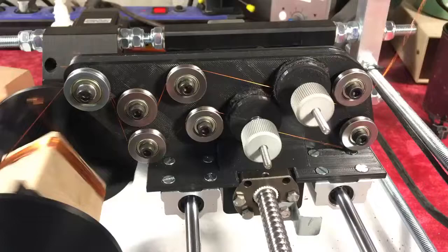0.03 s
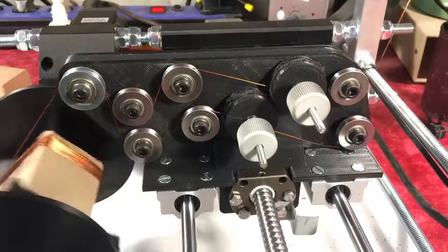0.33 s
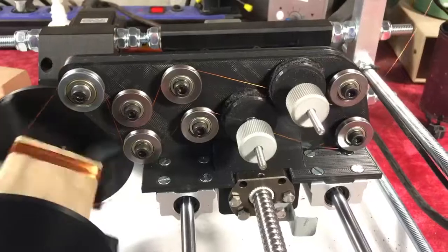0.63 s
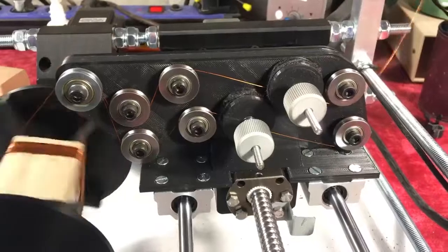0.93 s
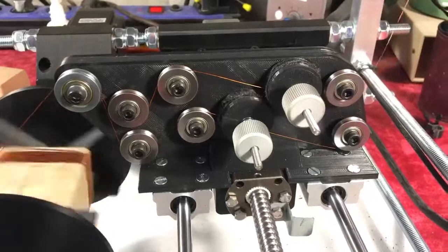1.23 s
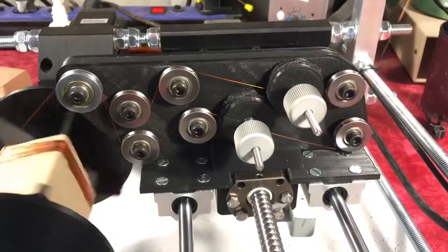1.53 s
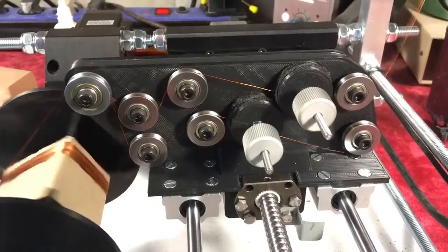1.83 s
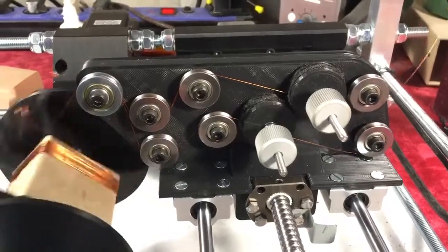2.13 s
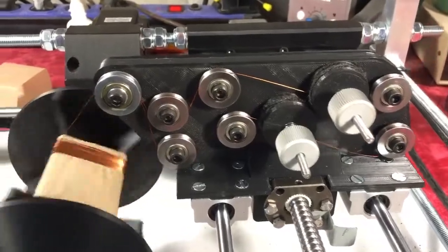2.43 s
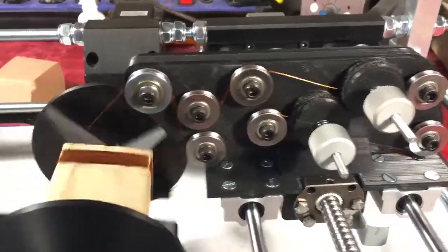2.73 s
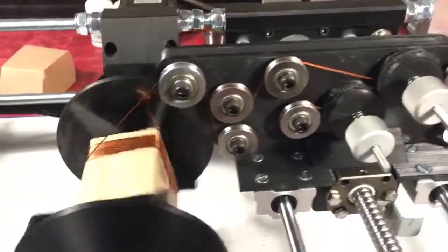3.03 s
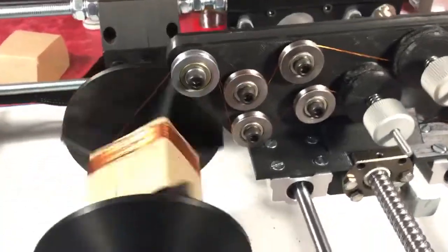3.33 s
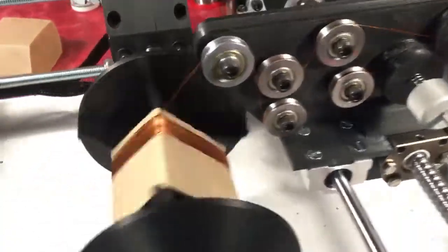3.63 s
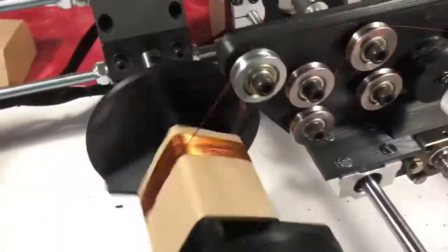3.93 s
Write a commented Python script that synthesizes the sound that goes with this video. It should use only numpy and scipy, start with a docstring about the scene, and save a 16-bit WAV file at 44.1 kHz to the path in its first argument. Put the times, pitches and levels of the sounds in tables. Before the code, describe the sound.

A coil winder's motor hums steadily, close by on a workshop bench, with a held whine and whirring bearings. Wire hisses thinly through its guide, loose pulleys chatter in short bouts, and two brief scrapes pass in the first half.

```python
"""A motor hums close by and shakes its frame: a coil winder running steadily on a workshop bench.
A stepper sings as it feeds the wire guide. Bearings and belt rustle. The shake throws loose pulleys
against their seats, twice a motor turn, in short bouts. Wire hisses through the guide,
with two brief scraping rattles and a few fainter scrapes."""
import sys
import numpy as np
from scipy import signal
from scipy.fft import rfft, irfft, next_fast_len
from scipy.io import wavfile
from scipy.ndimage import map_coordinates

SR = 44100
rng = np.random.default_rng(int(sys.argv[2]) if len(sys.argv) > 2 else 0)


def wrap_up_sound(samples):
    """Save the sound to the file named by the first command line argument, as 16-bit audio."""
    columns = np.atleast_2d(samples).T
    # keep every value between -1 and 1, then stretch to whole-number steps
    tamed = np.clip(columns, -1, 1)
    steps = np.round(tamed * 32767).astype(np.int16)
    wavfile.write(sys.argv[1], SR, steps)


N = 176400

# wire hiss contour: t/s, level/dB before trim
HISS_LEVELS = [(.08, -43.5), (.25, -48.5), (.45, -48.5), (.6, -46.5), (.78, -48), (.95, -49.5), (1.2, -47),
               (1.38, -47.5), (1.55, -47), (2.0, -47), (2.3, -48.5), (2.42, -49), (2.56, -45.5),
               (2.78, -47.5), (3.0, -49), (3.2, -49.5), (3.38, -50), (3.55, -47.5), (3.7, -50.5),
               (4.0, -49)]
# wire hiss spectrum, in front of the guide: f/Hz, relative level/dB
WIRE_FRONT_SPECTRUM = [(3000, -24.5), (5000, -19), (5300, -2), (5900, -7.5), (6400, 5), (6850, 7.5),
                       (7250, 2), (7550, 8), (8200, -6.5), (9000, -5.5), (9400, -24)]
# wire hiss spectrum, beside the guide: f/Hz, relative level/dB
WIRE_SIDE_SPECTRUM = [(3000, -17), (5000, -18), (5500, 0), (6300, 1), (7100, 1), (7700, -0.5), (8500, 3.5),
                      (9000, -0.5), (9400, -24)]
# bearing and belt spectrum: f/Hz, relative level/dB
WHIR_SPECTRUM = [(300, -5), (560, 0), (660, -5), (760, 0.5), (920, 8.5), (1250, 0.5), (2000, 0.5),
                 (2350, -4.5), (2850, -4.5), (3300, -2), (4000, -6), (5000, -17), (9000, -20.5)]
# scrapes: onset t/s, level/dB, decay/s
SCRAPE_BURSTS = [(.785, -34.5, .028), (.818, -42, .025), (1.734, -37.5, .018), (1.764, -31, .02),
                 (1.781, -33.5, .026), (2.106, -38, .018), (3.815, -41.5, .025)]
# scrape spectrum: f/Hz, relative level/dB
SCRAPE_SPECTRUM = [(500, -14.5), (1200, 0.5), (1800, -0.5), (2400, 0.5), (2900, 3.5), (3700, -4.5),
                   (4500, -6.5), (5000, -13.5), (5600, -9.5), (7500, -11), (9500, -23.5)]
# pulley chatter: centre t/s, half length/s, level/dB
CHATTER_BOUTS = [(0.089, 0.053, -45), (0.187, 0.029, -55), (0.346, 0.015, -48), (0.41, 0.059, -53.5),
                 (0.928, 0.0045, -44.5), (1.031, 0.03, -46), (1.125, 0.028, -47), (1.183, 0.017, -43),
                 (1.232, 0.022, -45), (1.387, 0.02, -47), (1.495, 0.053, -45), (1.872, 0.0091, -44.5),
                 (1.913, 0.0087, -49), (1.983, 0.016, -42.5), (2.029, 0.011, -43.5), (2.135, 0.073, -45),
                 (2.232, 0.021, -46.5), (2.342, 0.016, -41.5), (2.869, 0.037, -43.5), (2.984, .025, -41.5),
                 (3.05, .028, -39.5), (3.121, 0.017, -35), (3.171, 0.013, -35.5), (3.215, 0.037, -41),
                 (3.349, 0.0096, -41.5), (3.591, 0.025, -44), (3.782, 0.022, -40), (3.837, .015, -40),
                 (3.894, 0.012, -43.5), (3.99, .02, -42)]
# loose pulley resonances: f/Hz, width/Hz, relative level/dB
PULLEY_RESONANCES = [(1170, 250, -3), (1430, 100, 2), (1620, 207, -1.5), (2017, 240, -4), (2720, 240, -3),
                     (3210, 113, 3), (4440, 200, -2.5), (5780, 150, -7.5), (6470, 1300, -16.5),
                     (8800, 500, -17.5)]
# stepper whine: multiple of step rate, initial level/dB, growth/(dB/s)
STEPPER_PARTIALS = [(2, -37.5, 0.11), (2.5, -69, 1.5), (3.5, -67, 0), (5, -51, -0.8), (6, -66, 4),
                    (8, -55, -0.86), (10, -71.5, -6.5), (11, -70.5, 2.5), (12, -64, 0)]
# motor hum: multiple of turn rate, level/dB
MOTOR_PARTIALS = [(1, -47), (1.5, -48.5), (2.25, -46.5), (4, -51), (8, -57.5), (11, -67), (13, -60.5),
                  (14, -65.5), (15, -59.5), (16, -55.5), (17, -60), (18, -71), (19, -60), (24, -80),
                  (26, -61.5), (27, -72), (28, -63), (29, -61.5), (30, -59), (31, -75)]
# frame shake contour: t/s, level/dB before trim
SHAKE_LEVELS = [(0.08, -27), (0.1, -26), (0.31, -34), (0.33, -43), (0.53, -33), (0.75, -31.5), (1.18, -28),
                (1.38, -34), (1.45, -32.5), (1.8, -32.5), (1.9, -29.5), (2.16, -28), (2.43, -33.5),
                (3.06, -26.5), (3.3, -28), (3.32, -31.5), (3.5, -30), (4.0, -25)]
# frame rumble spectrum: f/Hz, relative level/dB
RUMBLE_SPECTRUM = [(20, -12), (40, -22), (60, 1.5), (85, -1.5), (140, 2), (175, -2), (215, -0.5),
                   (255, -6.5), (320, -9.5), (450, -13.5), (560, -16), (660, -20.5), (800, -13.5),
                   (1500, -53)]

TIME_S = np.arange(N) / SR
PADDED_N = next_fast_len(N + SR // 2)


def amp(db):
    """dB to gain."""
    return 10 ** (np.asarray(db) / 20)


def unit(x):
    """Scale to rms 1."""
    return x / np.sqrt(np.mean(x ** 2) + 1e-20)


def curve(rows):
    """Linear interpolation of (t/s, value) rows."""
    return np.interp(TIME_S, *np.transpose(rows))


def wobble(rate_hz):
    """Smooth random curve, knots at rate_hz."""
    knots = rng.standard_normal(4096)
    return map_coordinates(knots, [TIME_S * rate_hz + 2], mode="wrap")


def tone(cycles):
    """Sine, random phase; rms 1."""
    return np.sqrt(2) * np.sin(2 * np.pi * (cycles + rng.random()))


def colour(x, spectrum):
    """Minimum-phase filter from (f/Hz, level/dB) rows; rms 1."""
    size = 2 ** 18
    hz, db = np.transpose(spectrum)
    f_hz = np.fft.rfftfreq(size, 1 / SR)
    gain = amp(np.interp(np.log(f_hz + 1), np.log(hz), db))
    cepstrum = irfft(np.log(gain))
    cepstrum[1:size // 2] *= 2
    cepstrum[size // 2 + 1:] = 0
    return unit(irfft(rfft(x, size) * np.exp(rfft(cepstrum)))[:N])


def ring(x, modes):
    """Parallel resonances of alternating sign; rms 1."""
    f_hz = np.fft.rfftfreq(PADDED_N, 1 / SR)
    body = 0
    for k, (hz, width_hz, db) in enumerate(modes):
        damping = 1j * f_hz * width_hz
        body += (-1) ** k * amp(db) * damping / (hz ** 2 - f_hz ** 2 + damping)
    return unit(irfft(rfft(x, PADDED_N) * body, PADDED_N)[:N])


def grit(spread_db, grain_hz):
    """Noise in tiny grains of random size; rms 1."""
    grains = np.interp(TIME_S * grain_hz, np.arange(N), rng.standard_normal(N))
    return unit(amp(spread_db * np.clip(grains, -2, 2)) * rng.standard_normal(N))


def knocks(cycles, scatter_s, decay_s, spread_db=2):
    """One gritty contact per cycle, uneven in time and strength; rms 1."""
    onsets = np.flatnonzero(np.diff(np.floor(cycles)) > 0)
    late, strength = rng.standard_normal((2048, 2))[:len(onsets)].T
    onsets = np.clip(onsets + late * scatter_s * SR, 0, N - 1).astype(int)
    blows = np.bincount(onsets, amp(spread_db * np.clip(strength, -2, 2)), N)
    envelope = signal.lfilter([1], [1, -np.exp(-1 / (decay_s * SR))], blows)
    return unit(envelope * rng.standard_normal(N))


def wire_hiss(trim_db=-3.0, waver_db=1.8, move_start_s=2.4, move_length_s=0.93):
    """Wire rubs through the guide; the hiss spreads higher as the listener moves to the side."""
    angle_rad = np.pi / 2 * np.clip((TIME_S - move_start_s) / move_length_s, 0, 1)
    front = colour(grit(spread_db=1, grain_hz=800), WIRE_FRONT_SPECTRUM)
    side = colour(grit(spread_db=1, grain_hz=800), WIRE_SIDE_SPECTRUM)
    gain = amp(curve(HISS_LEVELS) + trim_db + waver_db * wobble(30))
    return gain * (np.cos(angle_rad) * front + np.sin(angle_rad) * side)


def bearing_whir(turns, level_db=-48.5, waver_db=2.4):
    """Bearings and belt rustle, a little more once a turn."""
    beat = knocks(turns, scatter_s=0.0005, decay_s=0.0025)
    rub = grit(spread_db=1.5, grain_hz=810) + 0.48 * beat
    return amp(level_db + waver_db * wobble(9.8)) * colour(rub, WHIR_SPECTRUM)


def scrapes(attack_s=0.007):
    """Dense bursts of contacts: fast rise, exponential decay."""
    force = np.zeros(N)
    for onset_s, db, decay_s in SCRAPE_BURSTS:
        age_s = TIME_S - onset_s
        rise = np.clip(age_s / attack_s, 0, 1)
        force += amp(db) * rise * np.exp(-np.maximum(age_s - attack_s, 0) / decay_s)
    return force * colour(grit(spread_db=2.5, grain_hz=700), SCRAPE_SPECTRUM)


def pulley_chatter(turns, idle_db=-53, hard_db=-42, split_hz=2900):
    """Loose pulleys hit their seats twice a turn; above hard_db, less of the force goes below split_hz."""
    force = amp(idle_db)
    for centre_s, half_s, db in CHATTER_BOUTS:
        force = force + amp(db) * np.exp(-((TIME_S - centre_s) / half_s) ** 2)
    hits = knocks(2 * turns, scatter_s=0.0007, decay_s=0.0018)
    rub = 0.55 * grit(spread_db=3, grain_hz=700)
    ringing = ring(hits + rub, PULLEY_RESONANCES)
    low = signal.sosfiltfilt(signal.butter(6, split_hz, fs=SR, output="sos"), ringing)
    low_share = np.maximum(force / amp(hard_db), 1) ** -0.34
    return force * (ringing - low + low_share * low)


def stepper(step_hz=198.72, waver_db=0.98, flutter_db=2.5, flutter_hz=5.6,
            screw_turn_s=1.01, swell_peak_s=0.55, swell_decay_s=3.2):
    """Step-rate partials: the first flutters and fades; the fourth swells once a lead screw turn."""
    steps = step_hz * TIME_S
    whine = sum(amp(db + growth_db_per_s * TIME_S + waver_db * wobble(12)) * tone(k * steps)
                for k, db, growth_db_per_s in STEPPER_PARTIALS)
    first_db = -39.5 - 1.17 * TIME_S
    flutter = np.sin(2 * np.pi * flutter_hz * TIME_S + wobble(2.7))
    first = amp(first_db + flutter_db * flutter) * tone(steps)
    fourth_db = -45.5 + 1.0 * TIME_S
    depth = 0.7 * np.exp(-TIME_S / swell_decay_s)
    swell = 1 + depth * np.cos(2 * np.pi * (TIME_S - swell_peak_s) / screw_turn_s)
    fourth = amp(fourth_db) * swell * tone(4 * steps)
    return whine + first + fourth


def motor(turns, hum_waver_db=1.26, shake_trim_db=-2.0, shake_waver_db=1.6, rumble_db=-41.0):
    """Shaft hum, frame shake at twice the turn rate, and rumble weakly following the shake."""
    contour_db = curve(SHAKE_LEVELS)
    hum = sum(amp(db + hum_waver_db * wobble(12)) * tone(k * turns) for k, db in MOTOR_PARTIALS)
    shake = amp(contour_db + shake_trim_db + shake_waver_db * wobble(10)) * tone(2 * turns)
    follow_db = 0.1 * (contour_db - contour_db.mean())
    rumble = amp(rumble_db + follow_db) * colour(rng.standard_normal(N), RUMBLE_SPECTRUM)
    return hum + shake + rumble


def scene(motor_hz=67.9, drift_hz=0.033):
    """Mono mix; motor, whir and chatter share one shaft."""
    turns = np.cumsum(motor_hz + drift_hz * wobble(4)) / SR
    drive = motor(turns) + stepper() + bearing_whir(turns)
    return (drive + pulley_chatter(turns) + wire_hiss() + scrapes())[None]


def record(dry, start_s=0.072, fade_s=0.003, cutoff_hz=9450):
    """Brief silence, fast fade-in, brick-wall low-pass."""
    faded = dry * np.clip((TIME_S - start_s) / fade_s, 0, 1)
    passband = np.fft.rfftfreq(PADDED_N, 1 / SR) < cutoff_hz
    return irfft(rfft(faded, PADDED_N) * passband, PADDED_N)[:, :N]


dry = scene()
out = record(dry)
wrap_up_sound(out)
```